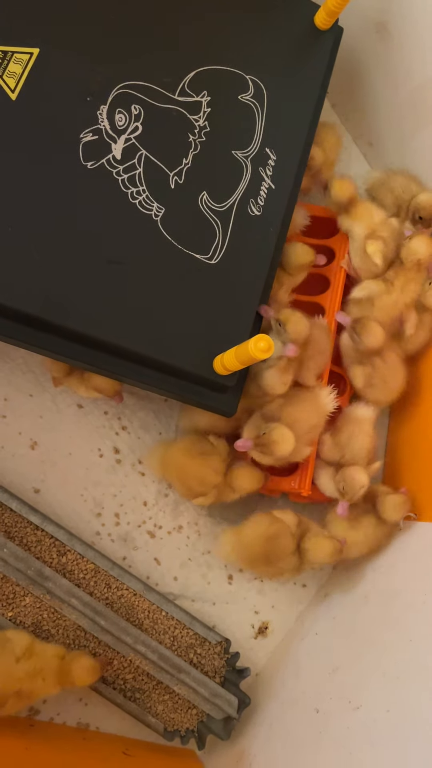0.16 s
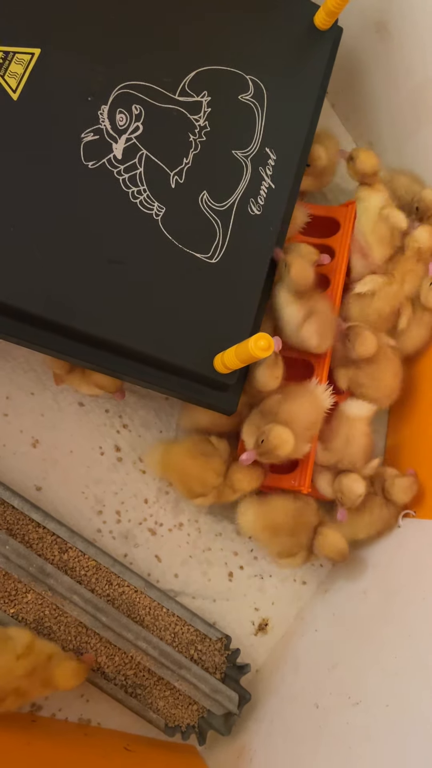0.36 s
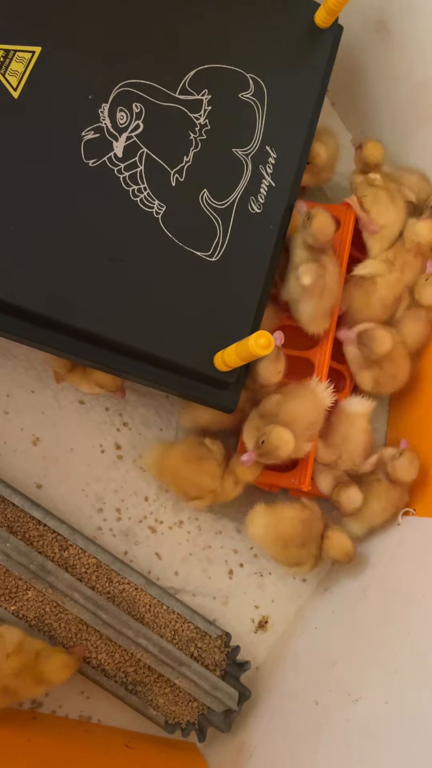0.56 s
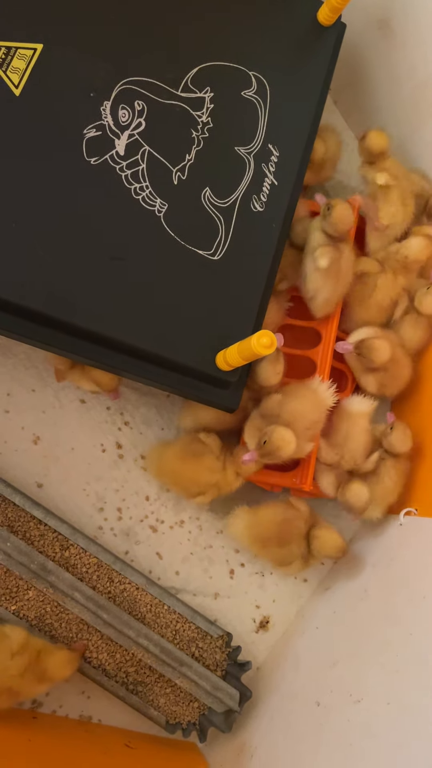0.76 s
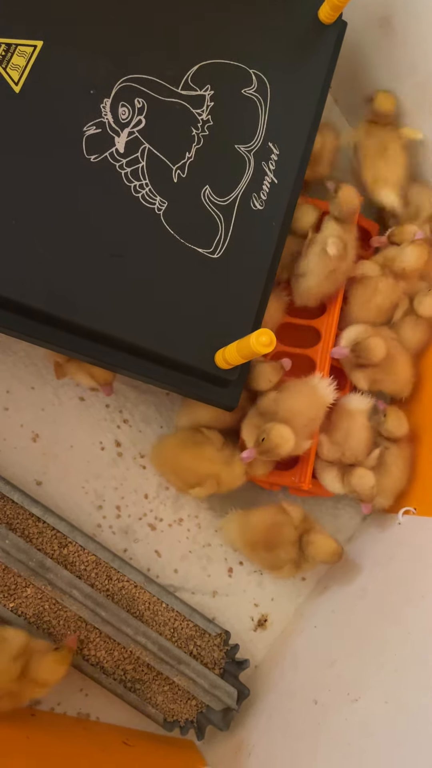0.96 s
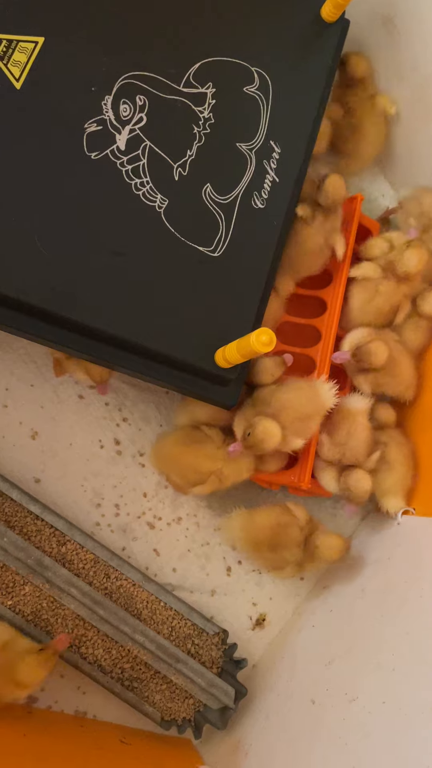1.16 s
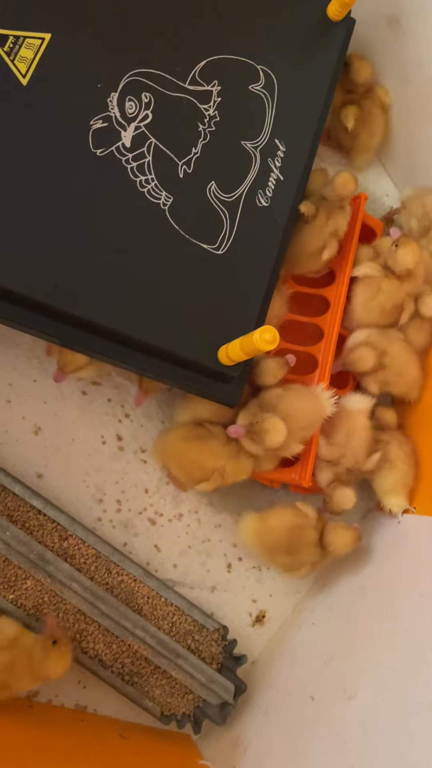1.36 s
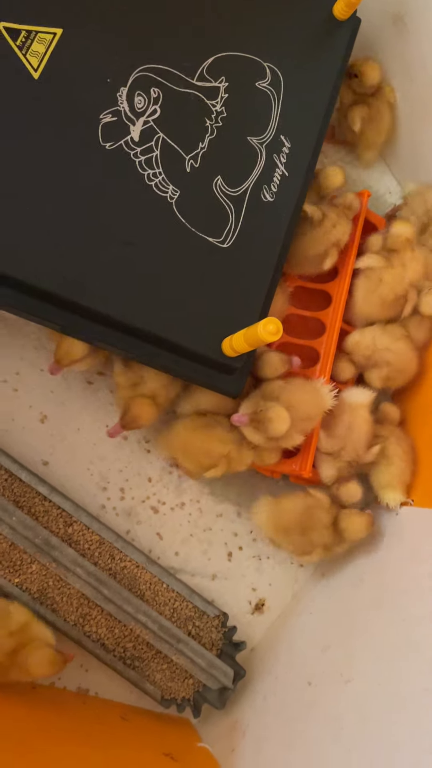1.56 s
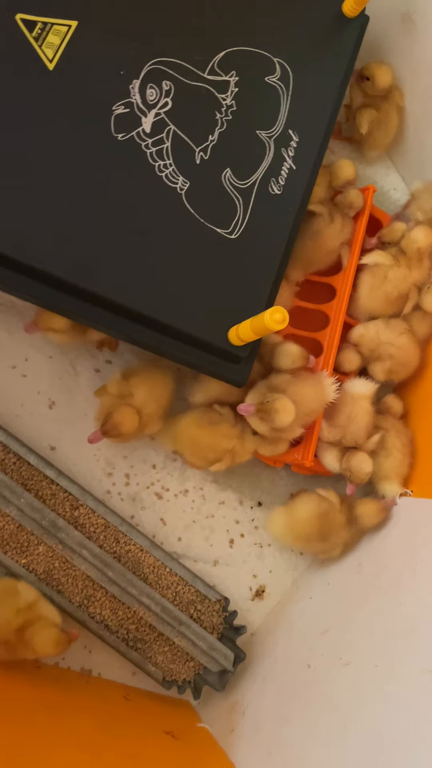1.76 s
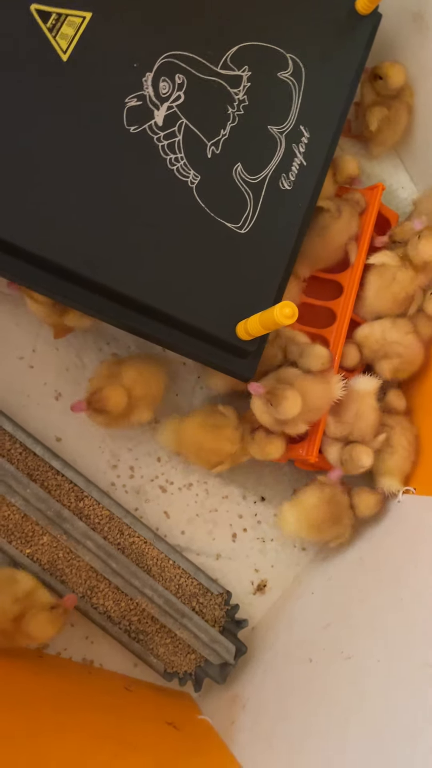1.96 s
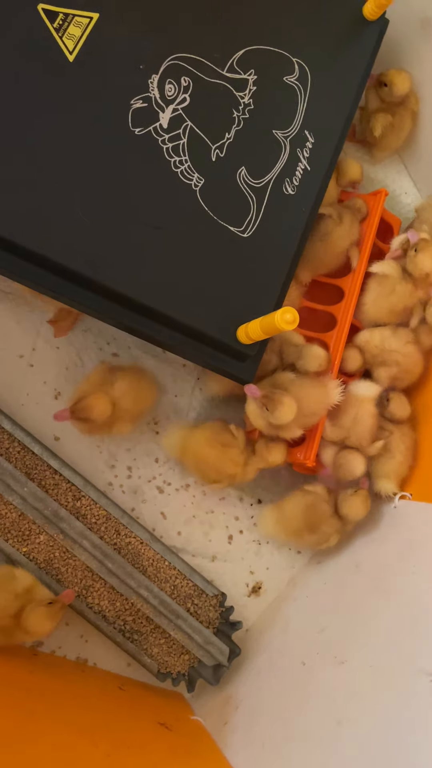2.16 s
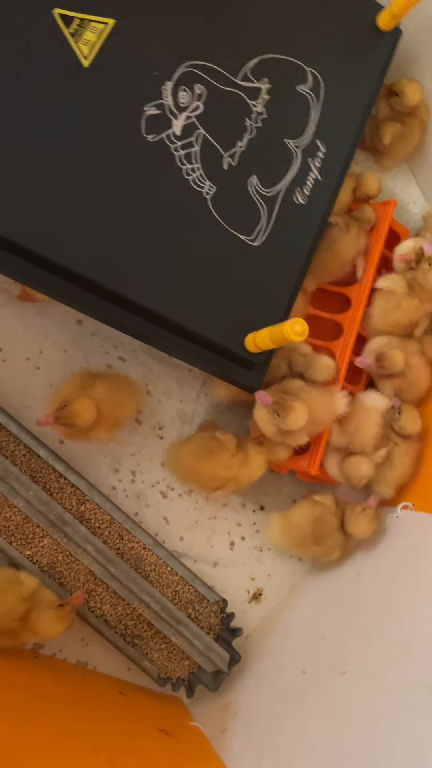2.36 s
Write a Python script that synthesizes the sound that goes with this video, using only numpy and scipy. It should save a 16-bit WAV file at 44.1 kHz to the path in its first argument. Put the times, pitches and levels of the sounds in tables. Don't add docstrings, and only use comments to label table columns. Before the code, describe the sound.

Many young ducklings cheep in a small indoor brooder, shuffling and tapping over a faint low hum.

```python
import sys
import numpy as np
from scipy import signal
from scipy.fft import rfft, irfft, next_fast_len
from scipy.io import wavfile
from scipy.ndimage import uniform_filter1d, map_coordinates

SR = 44100
rng = np.random.default_rng(int(sys.argv[2]) if len(sys.argv) > 2 else 0)


def pcm_store(signal):
    levels = np.round(np.clip(np.atleast_2d(signal), -1, 1) * 32767)
    wavfile.write(sys.argv[1], SR, levels.astype(np.int16).T)


def ratio_of_db(decibels):
    return 10 ** (np.asarray(decibels, float) / 20)


N = 105575
T = np.arange(N) / SR

# pitch_hz, density_db [dB per Hz]
LITTER = [(130, -1.5), (1600, -11), (2600, -4)]
AIR = [(2000, -2), (3500, 5.5), (6000, -4.5), (8500, 3.5)]
HISS = [(6000, -1), (12000, 7), (13500, -14.5)]
LITTER_DB, AIR_DB, HISS_DB = -61.5, -60, -64


def unit(x):
    return x / np.sqrt(np.mean(x ** 2) + 1e-20)


def along(points, hz):
    f, v = np.transpose(points)
    return np.interp(np.log(hz + 1), np.log(f + 1), v)


def wobble(rate_hz):
    knots = rng.standard_normal(int(N * rate_hz / SR) + 4)
    return map_coordinates(knots, [T * rate_hz])


def filtered(x, response):
    m = next_fast_len(N + SR // 2)
    return irfft(rfft(x, m) * response(np.fft.rfftfreq(m, 1 / SR)), m)[..., :N]


def noise(spectrum):
    low_hz, high_hz = spectrum[0][0], spectrum[-1][0]

    def colour(hz):
        return ratio_of_db(along(spectrum, hz)) / (1 + (hz / high_hz) ** 4) / (1 + (low_hz / (hz + 1)) ** 4)

    return unit(filtered(rng.standard_normal(N), colour))


def add(track, start_s, x):
    part = track[int(max(start_s, 0) * SR):][:len(x)]
    part += x[:len(part)]


def whistle(hz, db):
    edge_s, second_db, third_db = 0.003, -19, -24.5
    t = np.arange(len(hz)) / SR
    phase = 2 * np.pi * np.cumsum(hz) / SR
    ends = np.sin(np.pi / 2 * np.clip(np.minimum(t, t[::-1]) / edge_s, 0, 1)) ** 2
    voice = np.sin(phase) + ratio_of_db(second_db) * np.sin(2 * phase) + ratio_of_db(third_db) * np.sin(3 * phase)
    return np.sqrt(2) * ends * ratio_of_db(db) * voice


def long_peeps(quaver_db):
    # time_s, pitch_hz
    early = [
        [(0, 4980), (.03, 5030), (.06, 5054)],
        [(.005, 4700), (.035, 4010), (.065, 4214), (.085, 3877), (.115, 3402), (.15, 3050), (.162, 2430)],
        [(.165, 4190), (.185, 3850), (.203, 3750), (.22, 2630)],
        [(.235, 4000), (.27, 3655), (.3, 3180), (.325, 3172), (.345, 2715), (.352, 2350)],
        [(.37, 4800), (.42, 4000), (.46, 4380), (.5, 3500), (.548, 3165), (.556, 2100)],
        [(.425, 5260), (.455, 5380), (.475, 5140), (.49, 5620), (.51, 5570)],
        [(.68, 4450), (.705, 4430), (.725, 3750), (.76, 3100), (.78, 2080)],
        [(.755, 3950), (.79, 3730), (.81, 3250), (.835, 3300), (.852, 2984), (.862, 2200)],
        [(.755, 4750), (.78, 4420), (.79, 4110), (.812, 4000)],
        [(.824, 4050), (.85, 3850), (.875, 3500), (.893, 3610), (.906, 3100)],
        [(.815, 5020), (.828, 5350), (.84, 6640)],
    ]
    late = [
        [(.855, 5400), (.89, 5350), (.912, 4863), (.938, 5090), (.96, 6100)],
        [(1.048, 2055), (1.058, 3347), (1.072, 3790), (1.085, 3980), (1.1, 3870), (1.11, 4420)],
        [(1.112, 4174), (1.135, 4010), (1.15, 3800), (1.163, 3440), (1.174, 2300)],
        [(1.105, 3732), (1.12, 3480), (1.202, 3500), (1.22, 2120)],
        [(1.133, 5100), (1.145, 5750), (1.157, 5500), (1.176, 5600)],
        [(1.465, 3410), (1.483, 4700), (1.494, 4950), (1.505, 4150), (1.522, 3554), (1.545, 2780)],
        [(1.645, 2816), (1.665, 5460), (1.685, 5780), (1.712, 5010), (1.73, 5880)],
        [(1.73, 2260), (1.75, 5130), (1.765, 5490), (1.78, 5390), (1.792, 4200)],
        [(1.753, 4050), (1.775, 3960), (1.798, 3420)],
        [(1.82, 1897), (1.835, 3600), (1.85, 4337), (1.86, 3837), (1.92, 3014), (1.937, 2180)],
        [(2.118, 3480), (2.128, 3950), (2.143, 4270), (2.18, 3946), (2.197, 4410), (2.212, 4270)],
        [(2.339, 5090), (2.365, 6330), (2.38, 4880)],
        [(2.326, 2670), (2.337, 3980), (2.35, 4300), (2.366, 4900), (2.38, 4120), (2.392, 3090)],
    ]
    # loudest_s, level_db, softer_at_start_db, softer_at_end_db (the sign of the last
    breath = [(0.032, -34.5, 4, 18), (0.102, -42.5, -1, 6), (0.175, -43.5, -35, -0.5),
              (0.312, -37, 23.5, 23.5), (.47, -46, 3, 9), (0.448, -34, 33, 23), (0.721, -46, 16, 19),
              (0.813, -37, 10.5, 13), (.775, -47.5, -4, 11), (.838, -40, -4, 10), (.83, -53, -3, -29),
              (0.895, -34.5, 15, 19.5), (1.071, -40, 22, 14.5), (1.139, -34.5, 8, 20),
              (1.15, -38, -2, 14.5), (1.16, -47.5, 11, 18), (1.516, -45.5, 10.5, 27), (1.685, -56, -16, 3),
              (1.765, -54.5, 0, 2), (1.792, -47.5, 20, -5), (1.866, -34.5, 19.5, 20.5),
              (2.163, -35, 22, 24), (2.36, -47.5, 1, 0.5), (2.36, -49.5, 4.5, 11)]
    out = np.zeros(N)
    jitter = 1 + 0.0055 * wobble(150)
    for path, (top_s, db, rise_db, fall_db) in zip(early + late, breath):
        s, hz = np.transpose(path)
        span = (T >= s[0]) & (T < s[-1])
        pitch = uniform_filter1d(np.interp(T[span], s, hz), size=260, mode="nearest")
        depths = [abs(rise_db) ** .5, 0, abs(fall_db) ** .5]
        swell_db = -np.interp(T[span], [s[0], top_s, s[-1]], depths) ** 2
        out[span] += whistle(pitch * jitter[span], db + swell_db + quaver_db[span])
    return out


def short_chirps(quaver_db):
    # start_s, length_s, from_hz, to_hz, level_db
    glides = [(0, 0.025, 2920, 4060, -42), (.063, 0.0049, 5300, 6430, -40.5),
              (.122, 0.025, 1995, 3860, -45.5), (.148, 0.012, 5140, 4170, -40.5),
              (.374, 0.042, 6080, 4630, -49.5), (.705, 0.023, 1944, 3900, -47.5),
              (.734, .011, 2270, 3420, -53), (.74, 0.023, 6470, 5310, -45.5),
              (.795, 0.017, 1990, 2940, -50.5), (.926, 0.027, 3200, 4240, -40),
              (.958, 0.018, 3570, 3384, -50), (1.065, 0.085, 5020, 4840, -59),
              (1.18, 0.019, 4400, 4400, -45), (1.207, .022, 5170, 4980, -57),
              (1.232, 0.02, 2840, 4160, -44.5), (1.27, 0.02, 4330, 2930, -48.5),
              (1.335, 0.028, 2260, 4610, -50), (1.334, 0.061, 4380, 2557, -57.5),
              (1.505, 0.029, 4950, 5300, -58), (1.622, 0.0083, 2090, 1230, -63),
              (2.158, 0.0099, 3060, 1900, -47.5), (2.157, 0.007, 5600, 7700, -51),
              (2.297, 0.025, 5330, 5180, -58.5)]
    # start_s, length_s, top_hz, edge_hz, level_db
    arches = [
        (1.253, 0.026, 5820, 4760, -55),
        (2.172, 0.037, 5780, 5150, -48.5),
        (2.218, .036, 6200, 5200, -57),
        (2.235, 0.035, 3826, 3070, -42.5),
        (2.247, .022, 4350, 4170, -42.5),
    ]
    out = np.zeros(N)
    for table, arched in ((glides, False), (arches, True)):
        for s, length_s, a_hz, b_hz, db in table:
            u = np.linspace(0, 1, int(length_s * SR))
            bow = (2 * u - 1) ** 2
            pitch = a_hz + (b_hz - a_hz) * (bow if arched else u)
            add(out, s, whistle(pitch, db - 6 * bow + quaver_db[:len(u)]))
    return out


def ducklings():
    quaver_db = 1.6 * (wobble(59.74) + wobble(300))
    calls = long_peeps(quaver_db) + short_chirps(quaver_db)
    return calls * (1 + 0.13 * wobble(1200))


def fan():
    # pitch_hz, density_db [dB per Hz]
    rumble = [(42, -7), (75, -12), (130, -14)]
    rumble_db, hum_db, hum_hz = -63, -60, 68.7
    hum = ratio_of_db(hum_db + 0.93 * wobble(29.76)) * np.sin(2 * np.pi * hum_hz * T + 0.75 * wobble(10))
    return hum + ratio_of_db(rumble_db) * (1 + 3.1 * np.exp(-T / 0.05)) * noise(rumble)


def air_noise(near):
    stir = unit(unit(uniform_filter1d(abs(near), size=5000)) + 1.52)
    air = ratio_of_db(AIR_DB + wobble(14.5)) * noise(AIR) * stir
    hiss = ratio_of_db(HISS_DB + 2.0 * wobble(11.43)) * noise(HISS) / stir ** 1.37
    return air + hiss


def scuffles():
    # start_s, length_s, level_db, resonance_hz
    scrapes = [
        (0.16, 0.67, -67.5, 740),
        (0.264, 0.28, -57, 337),
        (1.52, 0.25, -56, 1000),
        (1.521, 0.22, -53.5, 1790),
        (1.509, 0.17, -49.5, 2800),
        (1.665, 0.32, -62, 440),
        (1.841, 0.045, -42, 343),
    ]
    out, q = np.zeros(N), 3.2
    for s, length_s, db, hz in scrapes:
        grit = ratio_of_db(1.5 * wobble(150) + 2.3 * wobble(29.55)) * rng.standard_normal(N)
        rub = filtered(grit, lambda f: 1 / (1 + (q * (f / hz - hz / (f + 1))) ** 2))
        stroke = np.minimum((T - s) * 50, 2 * (s + length_s - T) / length_s)
        out += ratio_of_db(db) * unit(rub) * np.clip(stroke, 0, 1)
    return out


def thumps():
    # start_s, peak_db, pitch_hz
    steps = [(0.182, -40.5, 367), (0.236, -38.5, 616), (0.292, -34, 387), (0.358, -37.5, 388),
             (0.433, -46, 331), (0.824, -45.5, 650), (1.009, -37, 195.5), (1.184, -44, 209),
             (1.356, -39, 243), (1.414, -85, 1120), (1.633, -31, 1050), (1.706, -39.5, 750),
             (1.849, -31.5, 735), (2.101, -39.5, 687), (2.251, -46.5, 438)]
    ring_cycles, press_cycles, upper_db, puff_db, puff_s = 15.2, 0.69, -7.5, -14, 0.03
    out, t = np.zeros(N), T[:SR // 8]
    for s, db, hz in steps:
        fade = ratio_of_db(-60 * t * hz / ring_cycles) * (1 - np.exp(-t * hz / press_cycles))
        upper_hz = hz * rng.uniform(1.516, 2.634)
        body = np.sin(2 * np.pi * hz * t) + ratio_of_db(upper_db) * np.sin(2 * np.pi * upper_hz * t)
        dull = uniform_filter1d(uniform_filter1d(rng.standard_normal(len(t)), size=12), size=12)
        puff = dull * ratio_of_db(puff_db + 16 - 60 * t / puff_s)
        add(out, s, ratio_of_db(db) * (fade * body + puff))
    return out


def shuffle():
    # time_s, level_db
    bustle = [
        (0, -0.5),
        (.5, 1),
        (.62, -9.5),
        (.9, -5),
        (1.05, -2.5),
        (1.25, -9.5),
        (1.5, -1),
        (2.39, -3.5),
    ]
    grain = ratio_of_db(4.13 * wobble(70) + np.interp(T, *np.transpose(bustle)))
    return ratio_of_db(LITTER_DB) * unit(grain * noise(LITTER))


def feet():
    return thumps() + scuffles() + shuffle()


def bills():
    # start_s, peak_db
    ticks = [(0.2108, -47), (0.28, -47), (0.4206, -49.5), (0.4667, -43.5), (0.495, -46.5), (0.5287, -36),
             (0.6194, -65), (0.8135, -41), (.9373, -47), (0.956, -43), (1.069, -48), (1.0912, -44),
             (1.2645, -50), (1.413, -31), (1.4712, -46), (1.5514, -37), (1.7084, -35.5), (1.8573, -45),
             (2.086, -42.5), (2.3544, -40.5)]
    # pitch_hz, level_db, t60_s
    trough = [
        (1150, -6, 0.011),
        (3500, -43, 0.0084),
        (6100, -3, 0.036),
        (9240, 17, 0.011),
        (11160, 12, 0.011),
    ]
    out, t = np.zeros(N), T[:SR // 20]
    for s, db in ticks:
        ring = np.zeros(len(t))
        for hz, mode_db, t60_s in trough:
            fade = ratio_of_db(mode_db + rng.normal(0, 1.5) - 60 * t / t60_s)
            ring += fade * np.sin(2 * np.pi * hz * rng.normal(1, .04) * t)
        click = 1.8 * ratio_of_db(-60 * t / 0.0081) * np.diff(rng.standard_normal(len(t) + 1))
        add(out, s, ratio_of_db(db - 8) * (ring + click))
    return out


def walls(x):
    # pitch_hz, t60_s
    decay = [(200, 0.26), (3400, 0.26), (5200, 0.18), (9000, 0.34)]
    hz, t, z = signal.stft(rng.standard_normal((3, SR // 2)), SR, nperseg=256)
    fade = ratio_of_db(-60 * t / along(decay, hz)[:, None])
    tail = signal.istft(z * fade, SR, nperseg=256)[1]
    delayed = np.pad(x, (120, 0))[None]
    return signal.fftconvolve(delayed, tail / np.linalg.norm(tail[0]), axes=1)[:, :N]


def ports(x):
    # pitch_hz, left_lead_rad
    lead = [(300, 0), (950, -.4), (1400, 0), (2580, .4), (4050, 1.5), (4740, 2.7), (5300, 6), (8400, 8.5),
            (9300, 9.35), (10700, 9.5), (11600, 10.6), (14000, 11.6)]
    # pitch_hz, left_over_right_db
    tilt = [(60, 0), (700, 2.2), (1500, 0), (5000, -2.6), (8500, 0)]

    def half(hz):
        return ratio_of_db(along(tilt, hz) / 2) * np.exp(.5j * along(lead, hz))

    return filtered(x, lambda hz: np.array([half(hz), 1 / half(hz)]))


def diffuse(other, third):
    # pitch_hz, level_db
    unlike = [(60, -14.5), (600, -3), (1700, -16.5), (3300, -2), (5200, -1.5), (9000, -17)]
    centre_hz, width_hz, alike_db = 4750, 390, 0.5
    around = other + ratio_of_db(LITTER_DB) * noise(LITTER) + ratio_of_db(HISS_DB) * noise(HISS)
    apart = filtered(around, lambda hz: ratio_of_db(along(unlike, hz)))
    alike = filtered(third + ratio_of_db(AIR_DB) * noise(AIR),
                     lambda hz: ratio_of_db(alike_db) * np.exp(-((hz - centre_hz) / width_hz) ** 2))
    return apart * [[1], [-1]] + alike


def scene():
    near = ducklings() + feet()
    room, other, third = ratio_of_db(-8) * walls(near)
    direct = near + bills() + air_noise(near) + room
    return ports(direct) + diffuse(other, third) + fan()


def top_cut(x):
    return signal.sosfilt(signal.butter(12, 16490, fs=SR, output="sos"), x)


def record(dry):
    top_hz = 13400
    mix = filtered(dry, lambda hz: 1 / (1 + (hz / top_hz) ** 20) ** .5)
    return top_cut(mix)


dry = scene()
out = record(dry)
pcm_store(out)
```